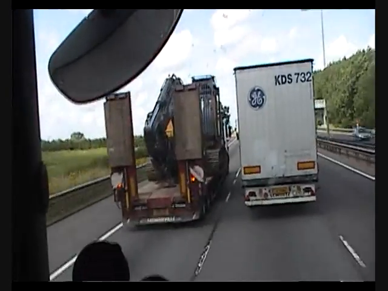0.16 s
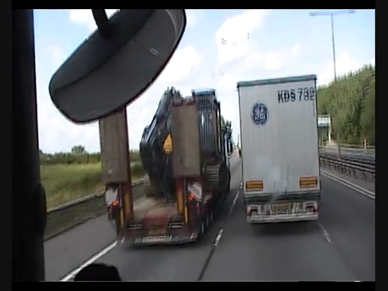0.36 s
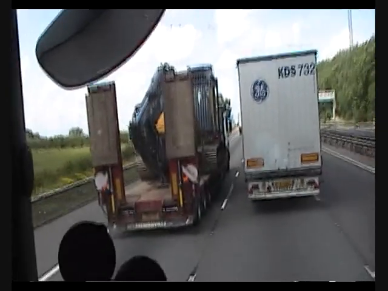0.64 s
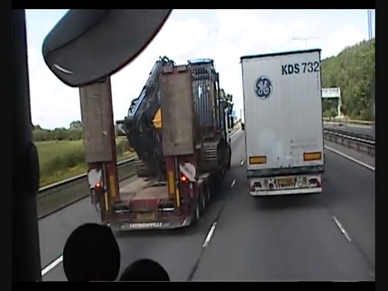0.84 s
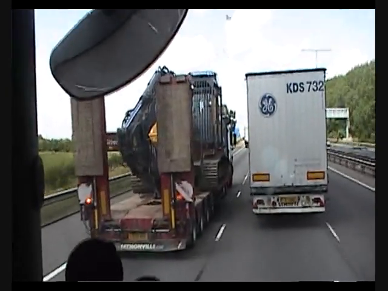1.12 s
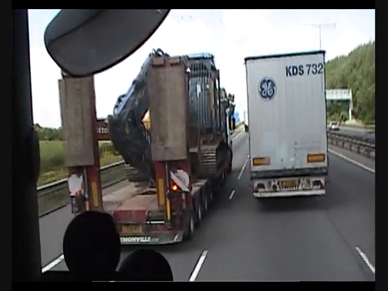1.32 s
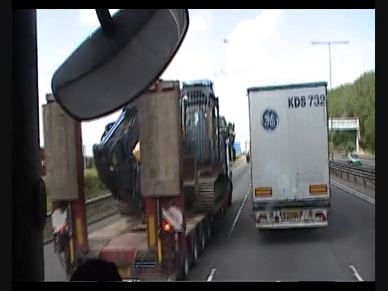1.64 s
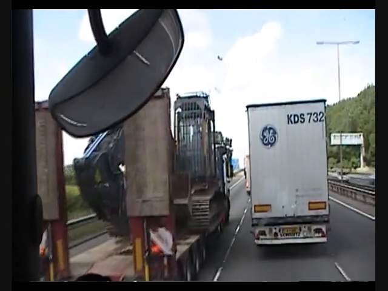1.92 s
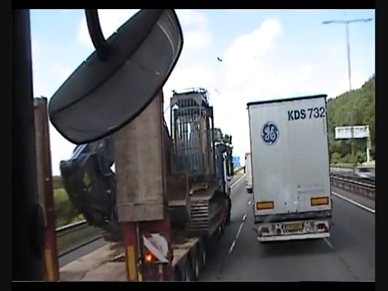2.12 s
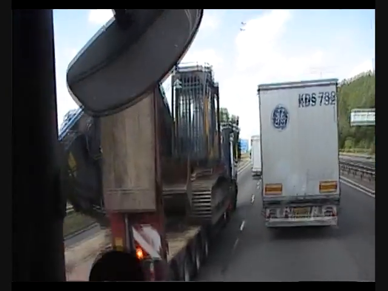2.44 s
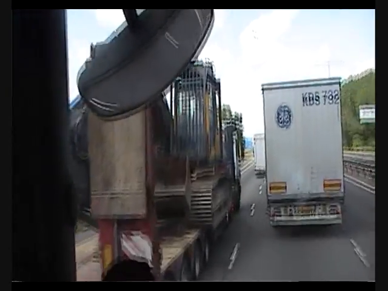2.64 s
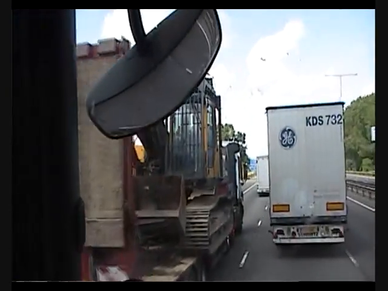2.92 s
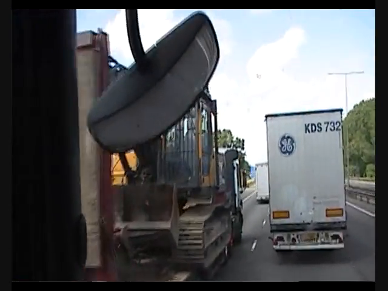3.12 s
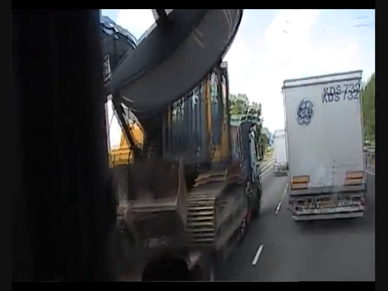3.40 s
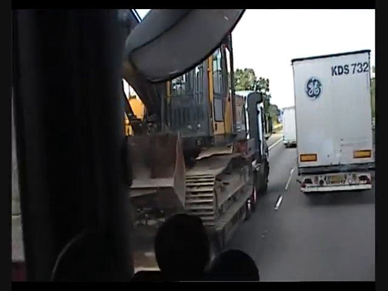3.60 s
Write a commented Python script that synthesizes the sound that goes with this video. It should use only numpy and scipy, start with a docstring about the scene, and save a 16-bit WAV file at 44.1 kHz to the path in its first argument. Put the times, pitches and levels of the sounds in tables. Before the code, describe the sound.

A diesel lorry engine drones steadily inside a cab on a motorway, under dense tyre and wind roar. Trim rubs and hisses lightly; the roar of a loaded lorry alongside grows near the end, with floor thuds.

```python
"""Inside a lorry cab at motorway speed, drawing level with a low-loader.
The six-cylinder diesel is a sum of crank orders, with a second drone beating against its firing note.
Tyre and wind roar and a high hiss in spells are coloured noise; a thin whistle, likely the turbocharger,
glides up and down, above faint drivetrain whines. Cab trim chafes as swelling narrow-band noise,
the floor thuds as struck damped modes, and the other lorry's roar and whine swell towards the end."""
import sys
import numpy as np
from scipy import signal
from scipy.io import wavfile
from scipy.ndimage import uniform_filter1d

SR = 44100
rng = np.random.default_rng(int(sys.argv[2]) if len(sys.argv) > 2 else 0)


def wav_record(signal):
    """Record a signal, one row per channel, as 16-bit PCM in the file named by sys.argv[1]."""
    frames = np.transpose(np.atleast_2d(signal))
    bounded = np.clip(frames, -1, 1)
    # unit amplitude maps onto the largest positive 16-bit level
    quanta = np.round(bounded * 32767).astype(np.int16)
    wavfile.write(sys.argv[1], SR, quanta)


N = 165816
TIME = np.arange(N) / SR


def amp(db):
    """Level in decibels to amplitude ratio."""
    return 10 ** (np.asarray(db) / 20)


def unit(x):
    """Normalises a signal to an rms of one."""
    return x / np.sqrt(np.mean(abs(x) ** 2) + 1e-20)


def curve(rows, axis=1):
    """Linear interpolation of one column of a time table at every sample."""
    rows = np.array(rows)
    return np.interp(TIME, rows[:, 0], rows[:, axis])


def colour(rows, hz):
    """Interpolates a spectrum in dB on a log-frequency axis."""
    f, db = np.transpose(rows)
    return np.interp(np.log(hz + 1), np.log(f + 1), db)


def drift(rate_hz):
    """Low-passed complex Gaussian noise of rms one: random motion no faster than about rate_hz."""
    hz = np.fft.fftfreq(N, 1 / SR)
    real, imaginary = rng.standard_normal((2, N))
    spectrum = (real + 1j * imaginary) / (1 + (hz / rate_hz) ** 4)
    return unit(np.fft.ifft(spectrum))


def tone(hz, width_hz, rough):
    """Random modulation broadens a line: strength and phase flutter by the share rough; rms one."""
    carrier = np.exp(2j * np.pi * np.cumsum(hz * np.ones(N)) / SR)
    modulation = np.sqrt(1 - rough ** 2) + rough * drift(width_hz / 2)
    return unit((carrier * modulation).real)


def burst(centre_s, half_s):
    """A Gaussian envelope of peak one and standard deviation half_s."""
    return np.exp(-.5 * ((TIME - centre_s) / half_s) ** 2)


def roar(spectrum, size=2048):
    """Spectral shaping of white noise into a stereo roar whose mid (half-sum) signal has an rms of one."""
    # level of side against mid: f/Hz, level/dB
    side_width = [(30, -9), (120, -23), (300, -28.5), (600, -20.5), (1100, -12), (1500, -14), (2000, -8.5),
                  (2300, -2.5), (2700, -6.5), (3100, -5), (3400, -6.5), (3800, -3.5), (4100, -47),
                  (12000, -49)]
    patch_db, swell_db = 0.94, -0.01  # rms of the random level changes
    overlap = size * 3 // 4
    hz = np.fft.rfftfreq(size, 1 / SR)
    z = signal.stft(rng.standard_normal((2, N)), nperseg=size, noverlap=overlap)[2]
    # patches vary over frequency and time, the swell over time alone
    patches = uniform_filter1d(rng.standard_normal(z.shape[1:]), size=12, axis=0)
    patches = unit(uniform_filter1d(patches, size=6, axis=1))
    swell = unit(uniform_filter1d(rng.standard_normal(z.shape[2]), size=14))
    z = z * amp(colour(spectrum, hz)[:, None] + patch_db * patches + swell_db * swell)
    z[1] *= amp(colour(side_width, hz))[:, None]
    mid, side = signal.istft(z, nperseg=size, noverlap=overlap)[1][:, :N]
    return np.array([mid + side, mid - side]) / mid.std()


def firing_cycles(crank):
    """A four-stroke six fires three times a turn: the running count of firings."""
    return np.cumsum(3 * crank) / SR


def engine(crank):
    """Periodic combustion gives lines at multiples of the crank rate; two close lines beat."""
    # engine orders: multiple of crank rate, level/dB, unsteadiness 0-1
    orders = [(6, -44, 0.5), (7.5, -43.5, 0.47), (10.5, -48.5, 0.8), (12, -47, 0.83), (15, -49.5, 0.2),
              (18, -46, 0.8), (19.5, -45.5, 0.13)]
    # two drones above the firing note: t/s, lower drone level/dB, upper drone level/dB
    drone_levels = [(0, -37, -33), (.85, -53, -30.5), (1.3, -39, -41), (1.6, -32, -32), (2.1, -44, -33),
                    (2.6, -36, -30.5), (2.9, -38, -46), (3.25, -32, -33.5), (3.6, -25.5, -34),
                    (3.76, -33, -36)]
    # cab boom on the ninth order: t/s, level/dB
    boom_level = [(0, -48), (.25, -33), (1.5, -36), (2.1, -35.5), (2.72, -36), (2.89, -26.5), (3.06, -30),
                  (3.18, -55), (3.76, -33)]
    # firing note: t/s, level/dB
    firing_level = [(0, -29.5), (.7, -32), (1.25, -35), (1.9, -28), (2.65, -34), (3.2, -31.5), (3.6, -25.5),
                    (3.76, -31)]
    beat_hz, beat_db, beat_peak_s = 4.8, -42.5, 0.075

    overtones = sum(amp(db) * tone(crank * order, width_hz=8.1, rough=rough)
                    for order, db, rough in orders)
    drones = sum(amp(curve(drone_levels, axis=column)) * tone(crank * order, width_hz=2.9, rough=0.16)
                 for column, order in [(1, 4.5), (2, 5)])
    boom = amp(curve(boom_level)) * tone(crank * 9, width_hz=8.3, rough=0.27)
    firing = firing_cycles(crank)
    note = amp(curve(firing_level)) * unit(np.cos(2 * np.pi * firing))
    # the second drone lies beat_hz above the firing note, in step with it at beat_peak_s
    second_cycles = firing + beat_hz * (TIME - beat_peak_s)
    second = amp(beat_db) * unit(np.cos(2 * np.pi * second_cycles))
    return note + second + overtones + drones + boom


def road(crank):
    """Broadband tyre and wind noise, amplitude-modulated by the firing, excites one hollow cab resonance."""
    # roar spectrum before normalising: f/Hz, relative level per Hz/dB
    road_spectrum = [(20, -27), (35, -23), (55, -0.5), (85, -1), (140, 1.5), (185, -2), (240, 1), (285, -3),
                     (330, -3), (390, -4.5), (452, 1), (505, -5), (600, -4.5), (680, -8), (800, -7.5),
                     (930, -13.5), (1030, -15.5), (1130, -16), (1320, -25), (1480, -28.5), (2050, -29),
                     (2700, -34), (3600, -37.5), (4150, -37), (4600, -45), (5300, -44), (7500, -46),
                     (11300, -53), (12600, -79)]
    # roar: t/s, level/dB
    road_level = [(0, -24.5), (.75, -24), (1.2, -24), (1.9, -25), (2.4, -23.5), (2.7, -24), (3.3, -24),
                  (3.76, -24)]
    # hollow cab resonance: t/s, level/dB
    ring_level = [(0, -46), (1.1, -43.5), (1.6, -29), (2.1, -35.5), (2.5, -49), (3.76, -44.5)]
    knock_depth = 0.075  # share of the amplitude
    throb = 1 + knock_depth * np.cos(2 * np.pi * firing_cycles(crank))
    ring = amp(curve(ring_level)) * tone(hz=254.7, width_hz=82, rough=1.0)
    return roar(road_spectrum) * amp(curve(road_level)) * throb + ring


def whines():
    """Drivetrain whines as randomly modulated lines, all falling in pitch by one small ratio."""
    # whines: f/Hz at the start, width/Hz, level/dB, unsteadiness 0-1
    whine_lines = [(1127, 51, -50, 0.96), (2052, 78, -60, 0.99), (2920, 53, -67, 1),
                   (3995, 30, -65.5, 0.66)]
    sag_per_s = .003  # share of the starting frequency
    return sum(amp(db) * tone(hz * (1 - sag_per_s * TIME), width_hz, rough)
               for hz, width_hz, db, rough in whine_lines)


def treble_level():
    """Amplitude gating: the high hiss comes in spells over a faint rest level, silent in one long lull."""
    # spells of hiss: start t/s, end t/s, level/dB
    spells = [(0.065, 0.394, -54.5), (.44, 0.834, -54.5), (0.87, 1.11, -56.5), (1.182, 1.23, -55.5),
              (1.27, 1.765, -54.5), (1.888, 2.457, -53), (2.53, 2.613, -53), (3.398, 3.48, -55.5),
              (3.53, 3.7, -54)]
    edge_s, rest_db = 0.0077, -63

    def gate(start_s, end_s):
        """Linear ramps open and close a gate, half open at the given times."""
        inside_s = np.minimum(TIME - start_s, end_s - TIME)
        return np.clip(inside_s / edge_s + .5, 0, 1)

    level = amp(rest_db) * (1 - gate(2.64, 3.38))  # the lull, in seconds
    for start_s, end_s, db in spells:
        level = np.maximum(level, amp(db) * gate(start_s, end_s))
    return level


def hiss(treble):
    """High-frequency coloured noise under the gated envelope."""
    # hiss spectrum before normalising: f/Hz, relative level per Hz/dB
    hiss_spectrum = [(20, -62), (4500, -16), (5300, -14), (5800, 0), (8500, 1), (10500, -3.5), (12000, -6),
                     (12600, -19)]
    return treble * roar(hiss_spectrum)


def turbo(treble):
    """Frequency modulation: a fluttering whistle glides in pitch and is stronger while the hiss is up."""
    # whistle pitch before smoothing: t/s, f/Hz
    whistle_pitch = [(0, 9670), (.2, 9530), (.58, 9320), (.74, 9170), (.95, 8850), (1.3, 8450), (1.5, 8190),
                     (1.61, 8240), (1.72, 8740), (1.96, 9570), (2.1, 9910), (2.2, 10020), (2.32, 9590),
                     (2.55, 8460), (2.8, 7380), (3.0, 7000), (3.15, 7400), (3.3, 7960), (3.76, 9600)]
    # whistle level with the hiss at its strongest, before normalised flutter: t/s, level/dB
    whistle_level = [(0, -55), (.2, -50.5), (.55, -55.5), (.85, -50), (1.3, -54.5), (1.52, -65),
                     (1.68, -51), (1.85, -53), (2.1, -51.5), (2.45, -53), (2.75, -59), (2.9, -62),
                     (3.2, -62.5), (3.57, -51), (3.76, -55)]
    inertia_s = .04  # moving average that rounds the glides
    hiss_share = 0.6  # part of the amplitude that follows the hiss
    hz = uniform_filter1d(curve(whistle_pitch), int(inertia_s * SR))
    follow = 1 - hiss_share + hiss_share * treble / treble.max()
    return amp(curve(whistle_level)) * follow * tone(hz, width_hz=224, rough=0.76)


def trim():
    """Friction of cab trim: each short rub is one noise-driven resonance inside a broad dry scrape."""
    # rubs: t/s, resonance level/dB at the peak, f/Hz, width/Hz, envelope standard deviation/s
    rubs = [(0.125, -52, 1600, 180, .02), (0.46, -47.5, 1610, 200, 0.0099), (.6, -51, 1590, 200, .014),
            (1.233, -46, 1590, 250, 0.013), (1.382, -48, 2770, 750, .008), (1.875, -56, 5330, 700, 0.0077),
            (1.44, -53, 1580, 180, .016), (1.936, -44.5, 1610, 250, 0.011), (2.068, -45, 1600, 240, 0.011),
            (3.352, -48.5, 1625, 160, 0.0087), (3.485, -47, 1596, 160, 0.02), (3.71, -48, 1617, 160, .009)]
    scrape = amp(-4.5) * tone(hz=2397, width_hz=1800, rough=0.95)  # level against the resonance
    return sum(amp(db) * burst(centre_s, half_s) * (tone(hz, width_hz, rough=1) + scrape)
               for centre_s, db, hz, width_hz, half_s in rubs)


def thuds():
    """Impulse response of damped modes: bumps in the road strike the cab floor."""
    # blows: t/s, strength/dB
    bumps = [(0.386, -21), (2.691, -21), (3.478, -15), (3.602, -14), (3.631, -19), (3.709, -17.5)]
    # modes of the floor: f/Hz, level/dB relative to the blow, 60 dB decay time/s
    modes = [(140, -4.5, 0.036), (185, -6, 0.029), (280, -7, 0.038), (447, -6, 0.036)]
    t = np.arange(SR // 10) / SR
    ring = sum(amp(db - 60 * t / t60) * np.sin(2 * np.pi * hz * t) for hz, db, t60 in modes)
    blows = np.zeros(N)
    for blow_s, db in bumps:
        blows[round(blow_s * SR)] = amp(db)
    return signal.oaconvolve(blows, ring)[:N]


def other_lorry():
    """Level growth on approach: the low-loader's tyre roar and whine swell, and the whine squeals twice."""
    # nearness: t/s, roar level relative to alongside/dB
    nearness = [(0, -41), (2.2, -23), (2.9, -7.5), (3.3, -2.5), (3.6, -0.5), (3.76, 0)]
    # its roar before normalising: f/Hz, relative level per Hz/dB
    pass_spectrum = [(20, -27), (45, -13), (75, -5.5), (160, 3.5), (225, -5), (400, -5.5), (800, -3),
                     (1100, -11), (1400, -23), (2200, -24), (3000, -30.5), (3700, -26), (4600, -41),
                     (7000, -48), (12600, -65)]
    # its whine: t/s, level/dB
    pass_whine_level = [(0, -85), (2.6, -74), (2.95, -61), (3.3, -64), (3.5, -59.5), (3.76, -61)]
    # squeals: t/s, level/dB at the peak, f/Hz
    squeal_times = [(3.543, -52, 3650), (3.712, -49, 3645)]
    alongside_db = -28.5
    tyres = amp(curve(nearness) + alongside_db) * roar(pass_spectrum)
    whine = amp(curve(pass_whine_level)) * tone(hz=3655, width_hz=97, rough=0.72)
    squeals = sum(amp(db) * burst(centre_s, half_s=0.018) * tone(hz, width_hz=77, rough=0.33)
                  for centre_s, db, hz in squeal_times)
    return tyres + whine + squeals


def scene():
    """Superposition of all sources in the cab, the engine ones tied to one slowly wandering crank rate."""
    crank_hz, speed_wander = 23.63, 0.0024  # the real part of the drift has an rms of about 0.7
    balance_db = 0.28  # left above right
    crank = crank_hz * (1 + speed_wander * drift(rate_hz=2.0).real)
    treble = treble_level()
    cab = engine(crank) + road(crank) + whines() + hiss(treble) + turbo(treble)
    cab = cab + trim() + thuds() + other_lorry()
    return cab * amp([[balance_db / 2], [-balance_db / 2]])


def record(dry):
    """Windowing softens both ends; a linear-phase low-pass then limits the band."""
    fade_s, edge_hz = .004, 12450
    to_nearest_end_s = np.minimum(TIME, TIME[::-1])
    ends = np.sin(np.pi / 2 * np.minimum(to_nearest_end_s / fade_s, 1)) ** 2
    taps = signal.firwin(1023, edge_hz, window=("kaiser", 9), fs=SR)
    return signal.oaconvolve(dry * ends, taps[None], "same")


dry = scene()
out = record(dry)
wav_record(out)
```